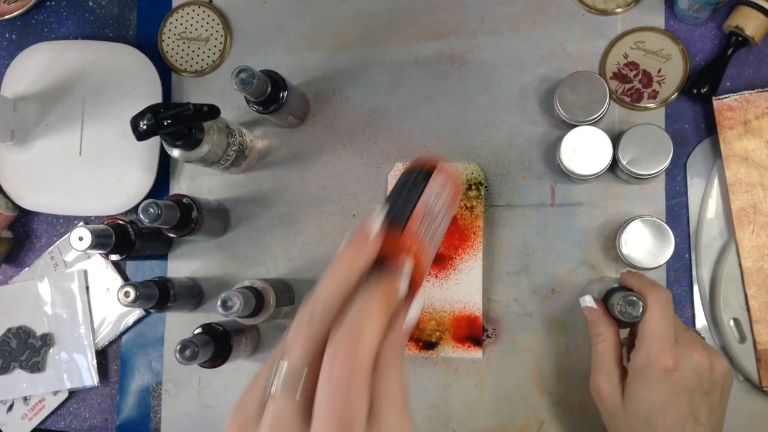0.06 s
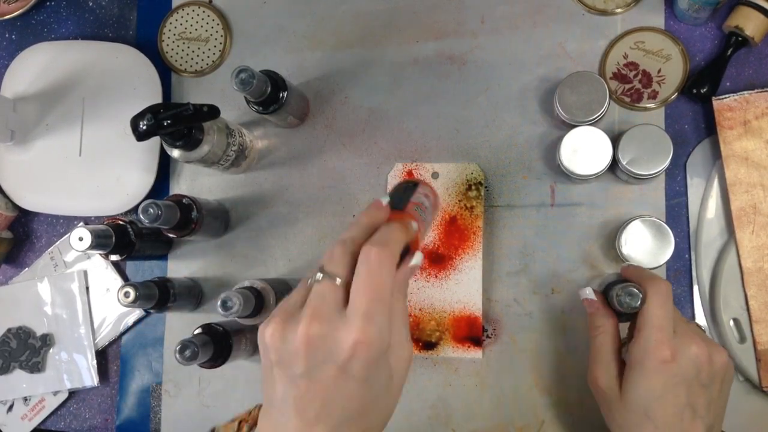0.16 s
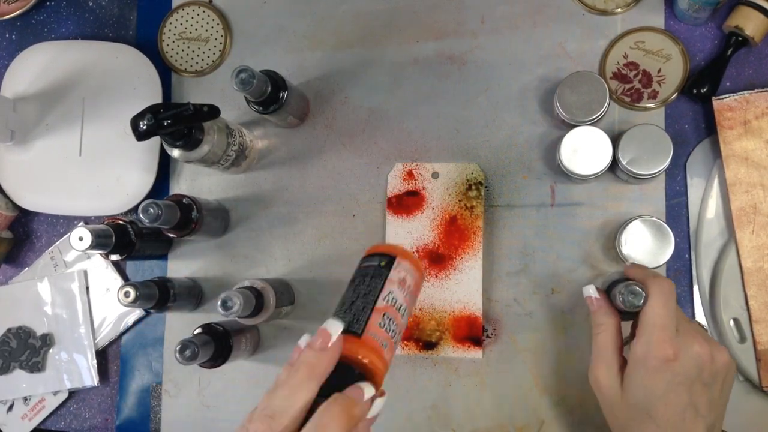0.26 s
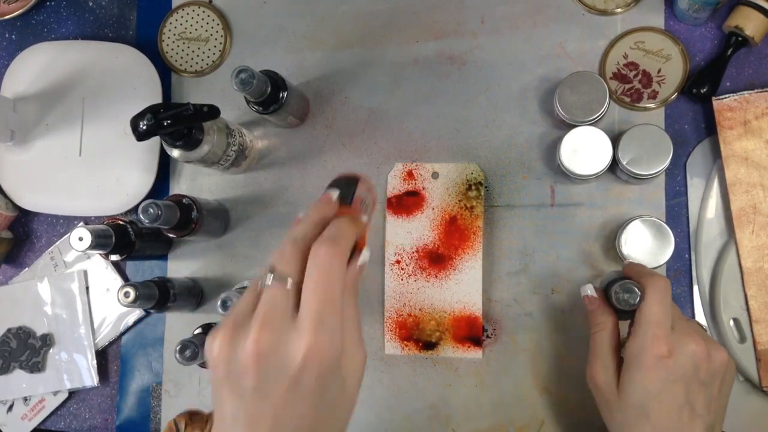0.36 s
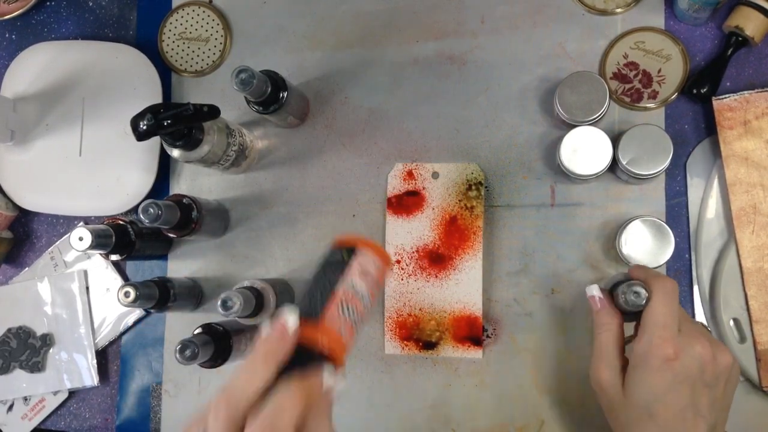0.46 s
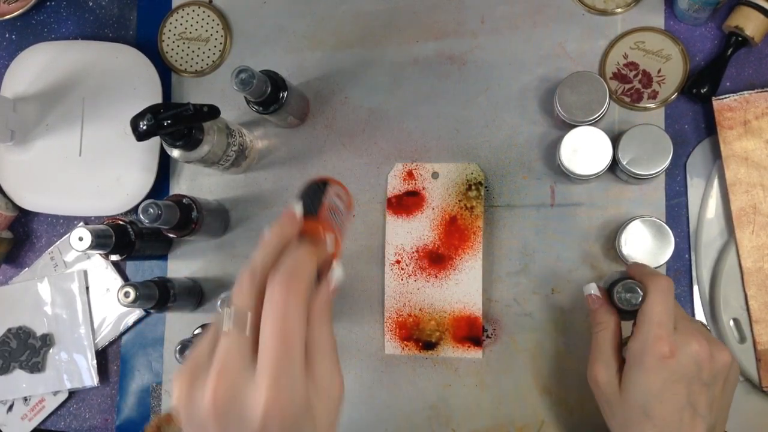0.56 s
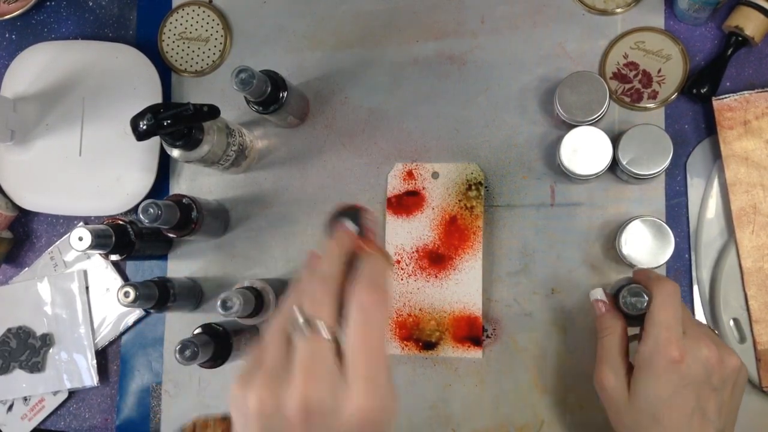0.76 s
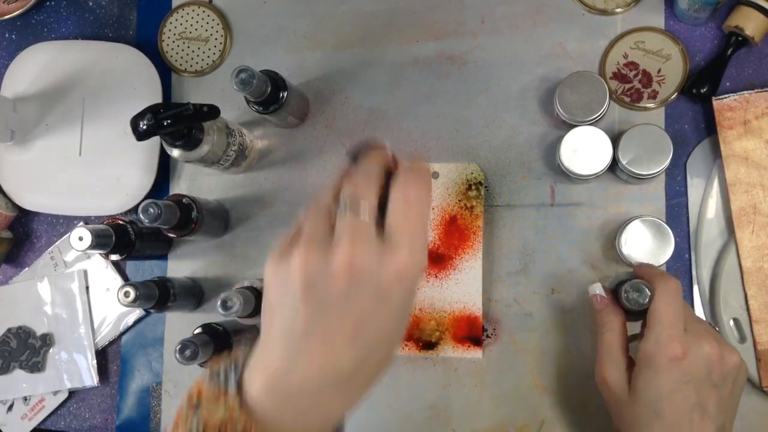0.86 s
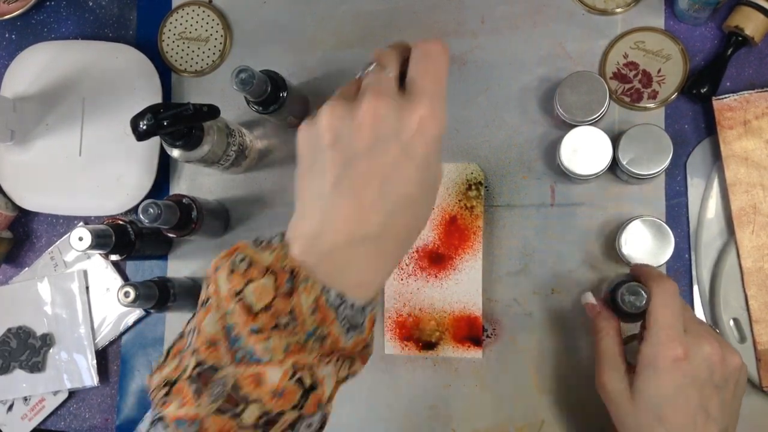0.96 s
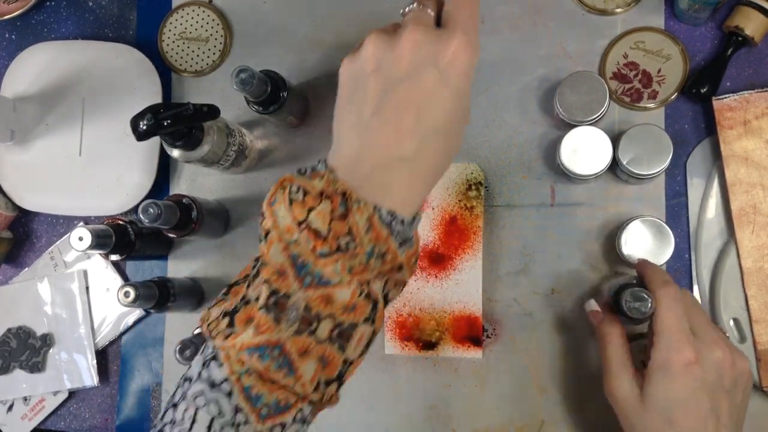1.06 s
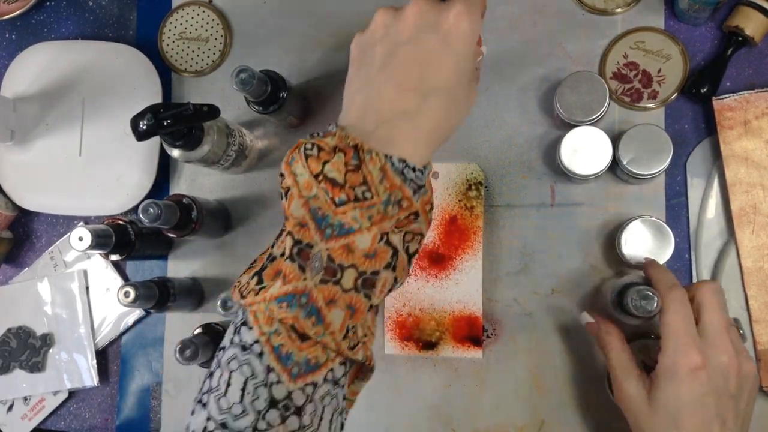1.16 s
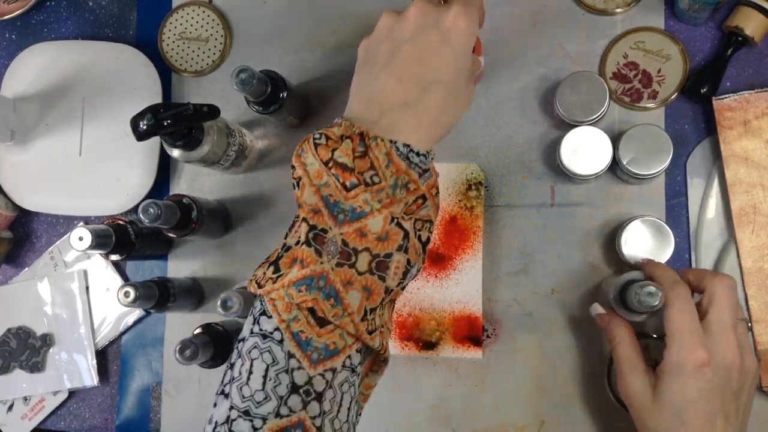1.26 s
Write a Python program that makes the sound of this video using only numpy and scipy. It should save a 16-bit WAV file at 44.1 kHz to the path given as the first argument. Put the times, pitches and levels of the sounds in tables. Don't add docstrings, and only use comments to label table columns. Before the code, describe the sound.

Small plastic bottle shaken by hand, sharp rattling ball clacks with wet slaps, then fading ticks

```python
import sys
import numpy as np
from scipy import signal
from scipy.fft import rfft, irfft
from scipy.io import wavfile

SR = 44100
rng = np.random.default_rng(int(sys.argv[2]) if len(sys.argv) > 2 else 0)


def file_out(sig):
    cols = np.atleast_2d(sig).T
    lim = np.clip(cols, -1, 1)
    pcm = np.round(lim * 32767).astype(np.int16)
    wavfile.write(sys.argv[1], SR, pcm)


def makeup_ratio(level_db):
    decades = np.asarray(level_db, float) / 20
    return 10 ** decades


N = 57330


def rms_one(x):
    return x / np.sqrt(np.mean(x ** 2) + 1e-20)


def dying(t60_s, size=9000):
    return makeup_ratio(-60 * np.arange(size) / SR / max(t60_s, .001))


def add(out, start_s, x):
    i = int(max(start_s, 0) * SR)
    out[i:i + len(x)] += x[:N - i]


def high_pass(x, order, hz):
    return signal.sosfilt(signal.butter(order, hz, "high", fs=SR, output="sos"), x)


def resonate(x, hz, width_hz):
    r = np.exp(-np.pi * width_hz / SR)
    zeros = [(1 - r * r) / 2, 0, (r * r - 1) / 2]
    poles = [1, -2 * r * np.cos(2 * np.pi * hz / SR), r * r]
    return signal.lfilter(zeros, poles, x)


def colour(x, spectrum, tilt_db=0):
    hz = np.maximum(np.fft.rfftfreq(len(x), 1 / SR), 10)
    at_hz, at_db = np.transpose(spectrum)
    gain_db = np.interp(np.log(hz), np.log(at_hz), at_db) + tilt_db * np.log2(hz / 4000)
    return rms_one(irfft(rfft(x) * makeup_ratio(gain_db), len(x)))


def ball_on_wall(rows):
    strike, note_width, base_note_db, crack_low_hz = 4.468, 0.31, -5, 2600
    out = np.zeros(N)
    noises = rng.standard_normal((len(rows), 4096))
    for (start_s, peak_db, hz, t60_s, note_db), noise in zip(rows, noises):
        burst = noise * np.abs(noise) * dying(t60_s, size=4096)
        burst[0] = strike
        crack = rms_one(high_pass(burst, 3, crack_low_hz))
        note = resonate(burst, hz, note_width * hz)
        note = rms_one(resonate(note, hz, 2 * note_width * hz))
        both = crack + makeup_ratio(base_note_db + note_db) * note
        add(out, start_s, makeup_ratio(peak_db) * both / np.abs(both).max())
    return out


def cracks():
    # (time [s], peak level [dB], wall note [Hz], dying time [s], note over crack [dB])
    hard_hits = [(.212, -2, 4910, 0.00147, 6.5), (.2137, -14.5, 3335, 0.0054, 9),
                 (.2145, -8.5, 6920, 0.00396, 0.5), (.2168, -19.5, 3860, 0.0034, 3),
                 (.2678, -10, 6000, .003, 12), (.2688, -18, 6500, .008, -6.5),
                 (.3932, -3, 3400, 0.00546, 0.5), (.3936, -4.5, 6470, 0.00347, 2.5),
                 (.3938, -8, 10300, 0.00326, 9), (.3952, -22, 3510, 0.0163, 12), (.4571, -3, 8300, .005, 3),
                 (.4585, -9.5, 7800, .02, 13), (.5752, -5.5, 3440, .004, 6.5),
                 (.5774, -2.5, 8100, 0.00116, -10.5), (.5785, -10, 3500, .012, -2),
                 (.6365, -19.5, 7000, .012, 1.5), (.6396, -10.5, 9500, .008, -7.5),
                 (.6415, -16.5, 4730, .012, -1), (.6474, -12, 6500, .006, 3), (.6496, -11.5, 5500, .01, -3),
                 (.7521, -2.5, 5680, .003, 15), (.8297, -9, 7540, 0.0042, -8.5),
                 (.8321, -10.5, 10070, 0.0022, -1), (.8328, -15, 6000, 0.0074, -9.5),
                 (.942, -17, 4000, .004, 2.5), (.943, -11, 7500, .004, 28.5), (.9446, -10.5, 7300, .005, 3),
                 (.9455, -15.5, 4300, 0.0031, -13), (.9495, -23, 11500, 0.0097, 8)]
    return ball_on_wall(hard_hits)


def ticks():
    # (time [s], peak level [dB], wall note [Hz], dying time [s])
    bounces = [(0.1624, -40, 6320, 0.032), (0.1701, -39.5, 3200, 0.0177), (0.179, -33, 5550, 0.0187),
               (0.1869, -26.5, 3080, 0.0166), (.1987, -31, 6700, 0.017), (.303, -24, 10000, 0.0113),
               (0.3143, -22.5, 5370, 0.0048), (0.3197, -20, 12560, 0.0037), (0.3201, -25, 11540, 0.00255),
               (0.3646, -23, 10460, 0.005), (0.3653, -24.5, 4530, 0.0113), (0.3827, -33, 4500, 0.0064),
               (0.488, -30, 7000, 0.021), (0.494, -17, 8000, 0.0136), (.498, -27, 8000, .008),
               (0.5, -29.5, 8000, 0.014), (0.5207, -27, 6940, 0.027), (0.5309, -20, 5600, 0.0158),
               (0.556, -47.5, 2840, 0.013), (0.573, -30, 5500, 0.0069), (0.5862, -16, 7100, 0.0137),
               (0.7175, -29, 4100, 0.023), (0.7289, -19, 2880, 0.0096), (0.7498, -20.5, 9000, 0.032),
               (.7758, -31.5, 6470, 0.0135), (0.8268, -24, 11000, 0.0061), (0.889, -26.5, 7930, 0.022),
               (0.9154, -25.5, 2600, 0.0296), (.937, -32.5, 7500, 0.041), (1.0083, -27.5, 7840, 0.062),
               (1.0185, -29, 6970, 0.035), (1.0306, -24, 9000, 0.0506), (1.0817, -34, 8470, 0.0095),
               (1.0845, -40, 3910, 0.0183), (1.0984, -34, 5780, 0.0137), (1.127, -42.5, 9030, 0.021),
               (1.1652, -43, 9200, 0.038), (1.1939, -39.5, 6720, 0.0435), (1.2766, -62, 12500, .01)]
    return ball_on_wall([(*bounce, 0.5) for bounce in bounces])


def liquid():
    # (time [s], spray level [dB], dying time [s], brightness [dB/octave], wall note [Hz])
    slaps = [(.005, -61, 0.199, -1, 3980), (.163, -55.5, 1, -8, 5140), (0.2131, -20.5, 0.067, 2.5, 3260),
             (0.268, -21, 0.0577, 4, 6150), (0.3142, -40, 0.11, 0.5, 8950), (0.366, -39.5, 0.088, -2, 4660),
             (.3945, -24.5, 0.08, 1.5, 6440), (.457, -26, 0.1846, 0, 8200), (.555, -38, 0.0486, -2.5, 3000),
             (0.5758, -22.5, 0.071, 1.5, 3630), (0.6299, -38, 0.134, -2, 9000),
             (0.6396, -28.5, 0.168, 1.5, 5400), (0.716, -35.5, 0.11, 0.5, 4260),
             (0.7521, -26, 0.2226, 2, 6360), (0.8295, -24.5, 0.1184, 0.5, 5300),
             (.885, -38.5, 0.138, -4, 5870), (0.9419, -24, 0.062, 1, 7570),
             (1.015, -36.5, 0.1257, -0.5, 3560), (1.044, -40, 0.0764, 0, 2390),
             (1.083, -42.5, 0.077, -2, 4200), (1.096, -48, 0.269, -1, 4500),
             (1.166, -55, 0.076, -4.5, 3500), (1.214, -57.5, .08, 2.5, 2600),
             (1.283, -61.5, 0.076, -2, 2500)]
    # (frequency [Hz], level [dB per Hz])
    spray_spectrum = [(180, -54), (300, -11), (1460, -6), (1700, -5), (4280, -6), (6790, -5), (8420, -8),
                      (14500, -9), (15500, -33)]
    drops_per_s, drop_spread_db, rise_s = 7000, 2.5, 0.000337
    note_db, note_width, dulling_db_per_s, spray_low_hz = -10.5, 0.77, 169, 563.7
    out = np.zeros(N)
    t = np.arange(12000) / SR
    lows = signal.butter(1, 6000, fs=SR)
    for start_s, db, t60_s, tilt_db, hz in slaps:
        hit, size, sign = rng.random((3, len(t)))
        drop_amp = makeup_ratio(-drop_spread_db * np.log(size + 1e-3))
        drops = (hit < drops_per_s / SR) * drop_amp * np.sign(sign - .5)
        spray = colour(drops, spray_spectrum, tilt_db)
        spray = spray + makeup_ratio(note_db) * rms_one(resonate(spray, hz, note_width * hz))
        low = signal.lfilter(*lows, spray)
        spray = low + (spray - low) * makeup_ratio(-dulling_db_per_s * t)
        rise = 1 - np.exp(-t / rise_s)
        add(out, start_s, makeup_ratio(db) * spray * rise * dying(t60_s, size=len(t)))
    return high_pass(out, 3, spray_low_hz)


def struck_and_fed(rows, width):
    fed_s, fed_db = 0.0237, 6.5
    out = np.zeros(N)
    noises = rng.standard_normal((len(rows), 9000))
    for (start_s, hz, db, t60_s), noise in zip(rows, noises):
        push = makeup_ratio(fed_db) * noise * dying(fed_s + t60_s) / 10
        push[0] += 3.5
        ring = resonate(resonate(push, hz, width * hz), hz, .5 * hz)
        add(out, start_s, makeup_ratio(db) * ring / np.abs(ring).max())
    return out


def air_pockets():
    # (time [s], frequency [Hz], level [dB], dying time [s])
    trapped = [(0.169, 669, -46, 0.01), (.169, 1063, -46.5, .01), (0.2122, 856.5, -33, 0.014),
               (.213, 1567, -26, 0.028), (.2682, 1026, -25, 0.0375), (.276, 1110, -29.5, 0.061),
               (0.2681, 1861, -18.5, 0.0495), (.355, 595, -47, 0.113), (0.367, 2200, -32, 0.0234),
               (.3935, 758, -33.5, 0.0066), (.3935, 902, -36, 0.0127), (0.394, 2750, -43, 0.048),
               (.4575, 1634, -18.5, 0.0183), (.465, 1892, -26, .04), (.495, 1642, -31.5, 0.069),
               (.533, 1920, -31, .01), (.556, 745.4, -42, 0.037), (.576, 2697, -20.5, 0.0213),
               (.576, 931, -31.5, 0.036), (.645, 803.5, -40, 0.144), (0.642, 1470, -22.5, 0.02),
               (0.649, 1436, -23, 0.081), (.641, 2072, -21, 0.04), (.659, 1744, -28, .12),
               (0.7516, 944, -30, 0.018), (.722, 696, -43.5, 0.077), (.83, 999, -26.5, 0.142),
               (.83, 1934, -23, 0.092), (.89, 1962, -32.5, 0.039), (.89, 1085, -48, .04),
               (.943, 1836, -37.5, 0.025), (.972, 1186, -43, 0.038), (1.098, 1350, -39.5, .04),
               (0.914, 1930, -42, 0.022), (.943, 534, -45, 0.0265), (0.958, 7600, -43, .09),
               (1.019, 1545, -32.5, .1), (1.02, 1086, -37.5, 0.055), (1.05, 1680, -42, 0.065),
               (1.086, 1934, -39, 0.078), (1.13, 1484, -41.5, 0.039), (1.286, 1510, -70.5, 0.061)]
    return struck_and_fed(trapped, width=0.144)


def wall_rings():
    # (time [s], frequency [Hz], level [dB], dying time [s])
    clear_rings = [
        (.2125, 856.8, -24.5, 0.013),
        (.2135, 4144, -17.5, .012),
        (.639, 798, -32, 0.055),
        (.9435, 4127, -22, 0.0125),
        (.9465, 7750, -22, .02),
        (.959, 7620, -29.5, .06),
        (1.0845, 3910, -39.5, 0.019),
        (1.099, 5620, -42, .02),
    ]
    return struck_and_fed(clear_rings, width=0.0649)


def desk():
    # (time [s], level [dB], softness [dB/octave], free ringing [s])
    knocks = [
        (0.509, -50.5, 6.5, 0.107),
        (0.553, -49.5, 4.5, 0.079),
        (0.7039, -34, 1.5, 0.0566),
        (.8845, -31, 1.5, 0.0576),
        (.913, -39, 0.5, 0.0464),
        (.922, -50, 1.5, 0.033),
        (.94, -44, 9, 0.0174),
        (1.077, -50.5, 13, 0.075),
    ]
    # (frequency [Hz], level [dB], t60 [s])
    board_modes = [(127.3, -7, 0.38), (209.4, 0, 0.12), (293.75, 5, 0.092), (321.3, -1.5, 0.132)]
    contact_s, damped_t60_s = 0.00357, .03
    out = np.zeros(N)
    t = np.arange(9000) / SR
    contact = np.sin(np.pi / 2 * np.minimum(t / contact_s, 1)) ** 2
    strengths_db = rng.normal(0, 1, (len(knocks), len(board_modes)))
    for (start_s, db, soft_db, free_s), own_db in zip(knocks, strengths_db):
        ringing = np.zeros(len(t))
        for (hz, mode_db, t60_s), extra_db in zip(board_modes, own_db):
            level_db = mode_db + extra_db - soft_db * np.log2(hz / board_modes[0][0])
            ringing += makeup_ratio(level_db) * np.sin(2 * np.pi * hz * t) * dying(t60_s)
        damping_db = 60 * np.maximum(t - free_s, 0) / damped_t60_s
        add(out, start_s, -makeup_ratio(db - 4.5 - damping_db) * ringing * contact)
    return out


def pushes():
    # (time [s], level [dB])
    low_pushes = [
        (0.214, -49),
        (0.393, -47),
        (0.456, -66.5),
        (0.575, -58),
        (.752, -35),
        (.9, -58),
    ]
    out = np.zeros(N)
    for start_s, db in low_pushes:
        add(out, start_s, -makeup_ratio(db) * np.hanning(60))
    return out


def room(x):
    room_db, low_t60_s, high_t60_s = -11, 0.465, 0.2658
    noise = rng.standard_normal(20000)
    low = signal.sosfilt(signal.butter(2, 3000, fs=SR, output="sos"), noise)
    tail = low * dying(low_t60_s, size=20000) + (noise - low) * dying(high_t60_s, size=20000)
    tail[:220] = 0
    tail = tail / np.sqrt(np.sum(tail ** 2))
    return makeup_ratio(room_db) * signal.fftconvolve(x, tail)[:N]


def hush():
    # (frequency [Hz], level [dB])
    hush_spectrum = [(18, -31), (70, -37), (125, -18), (208, -17.5), (443, -22), (747, -24.5), (2990, -30),
                     (3590, -27), (15500, -29)]
    return makeup_ratio(-65) * colour(rng.standard_normal(N), hush_spectrum)


def scene():
    bright = cracks() + ticks() + liquid()
    ringing = air_pockets() + wall_rings()
    reverb = room(bright + makeup_ratio(-4.5) * ringing)
    return (bright + ringing + desk() + reverb + hush())[None]


def band_limit(x):
    return signal.sosfilt(signal.butter(12, 16540, fs=SR, output="sos"), x)


def record(dry):
    mic_low_hz, cutoff_hz, edge_hz = 100.5, 15300, 16500
    heard = high_pass(dry, 4, mic_low_hz) + pushes()
    hz = np.fft.rfftfreq(N, 1 / SR)
    corners_hz = [cutoff_hz - 200, cutoff_hz + 200, edge_hz, edge_hz + 150]
    top_db = np.interp(hz, corners_hz, [-0.5, -36.5, -38.5, -66.5])
    return band_limit(irfft(rfft(heard) * makeup_ratio(top_db), N))


dry = scene()
out = record(dry)
file_out(out)
```